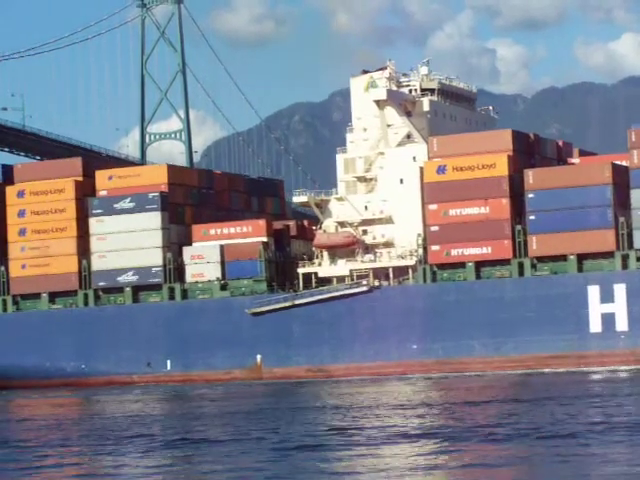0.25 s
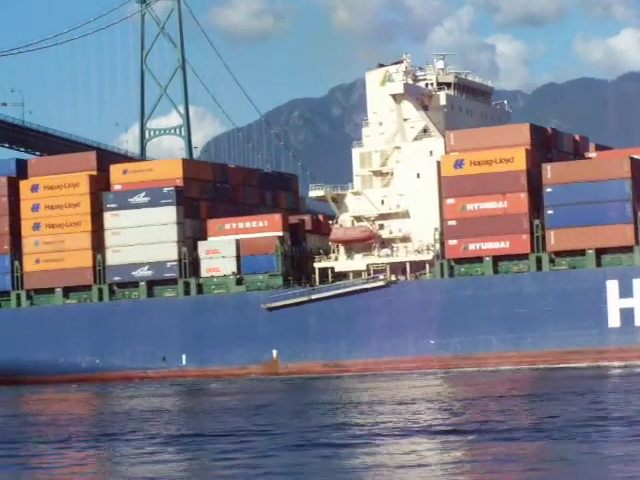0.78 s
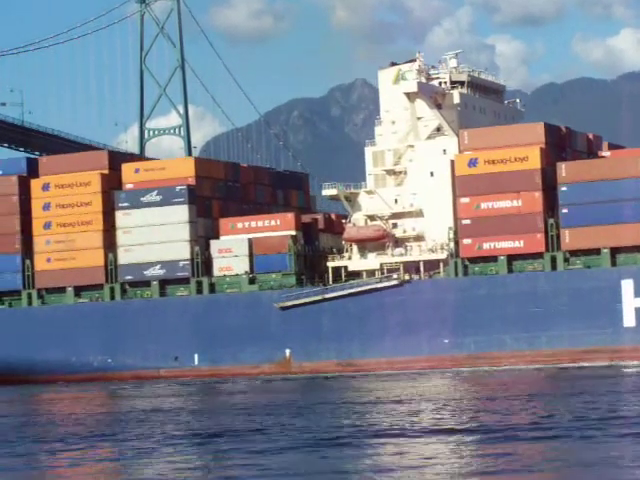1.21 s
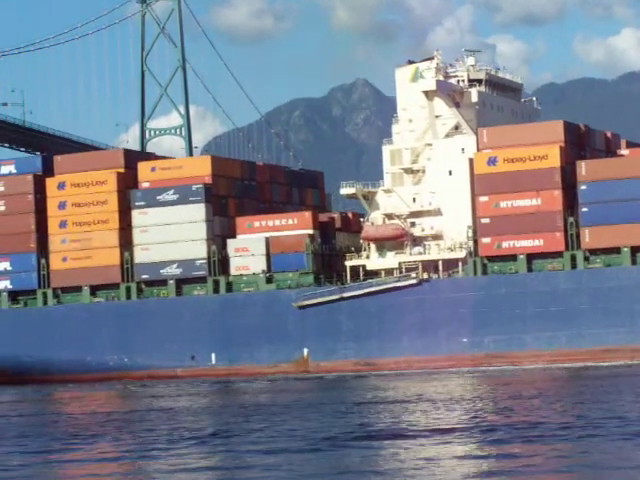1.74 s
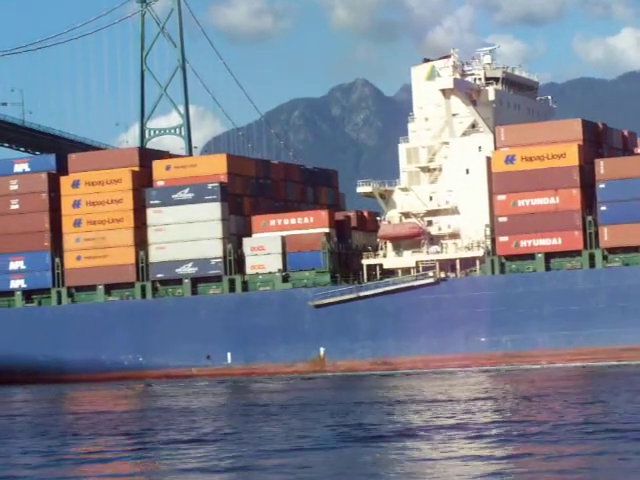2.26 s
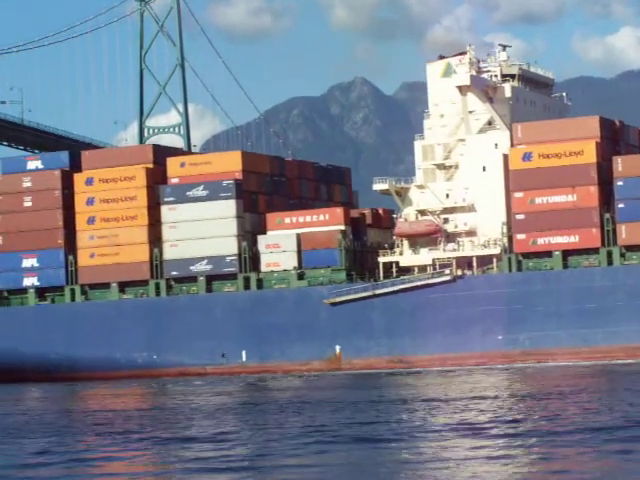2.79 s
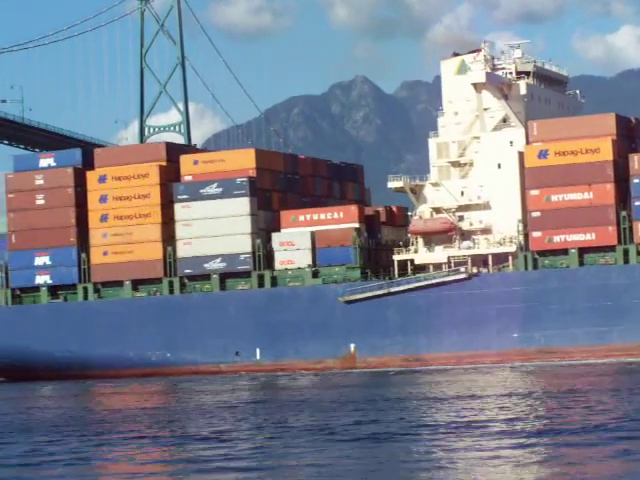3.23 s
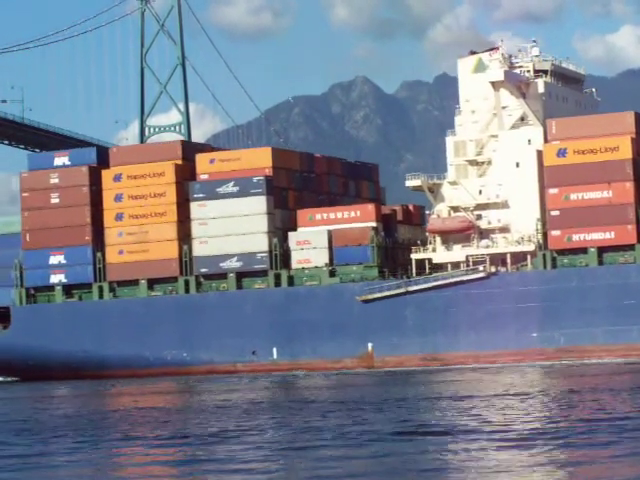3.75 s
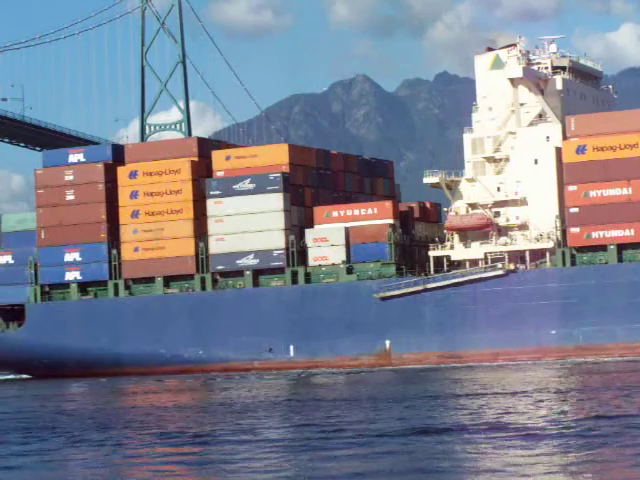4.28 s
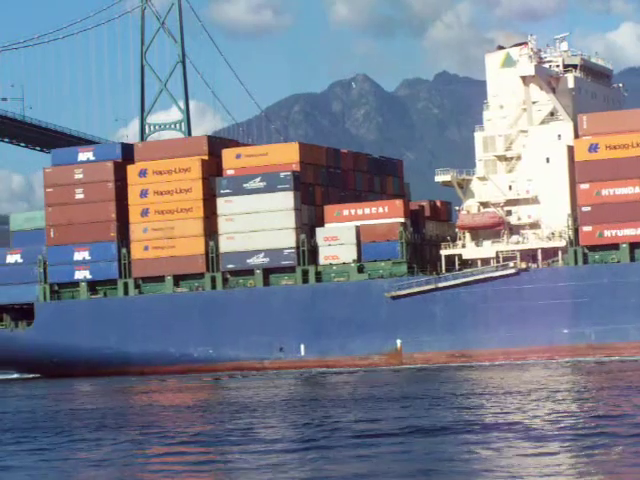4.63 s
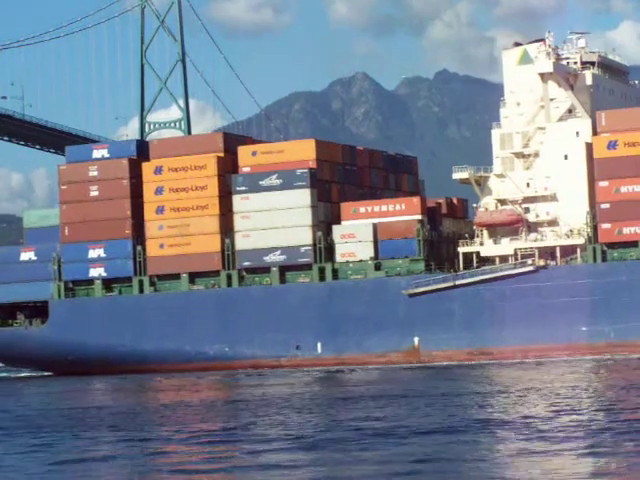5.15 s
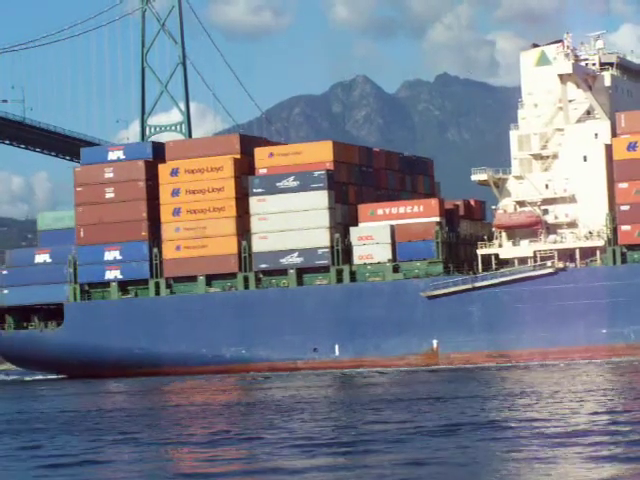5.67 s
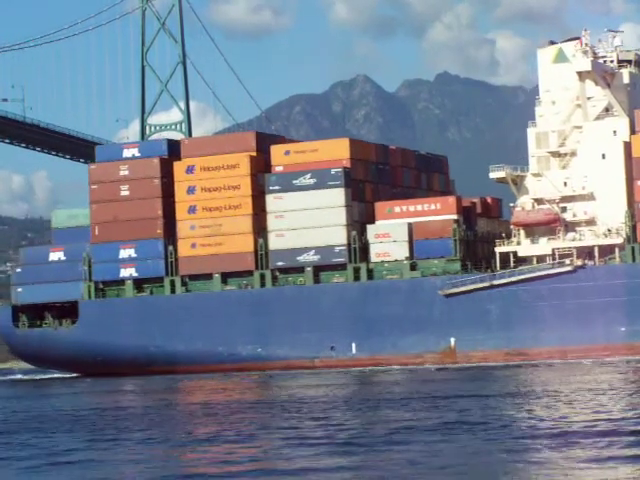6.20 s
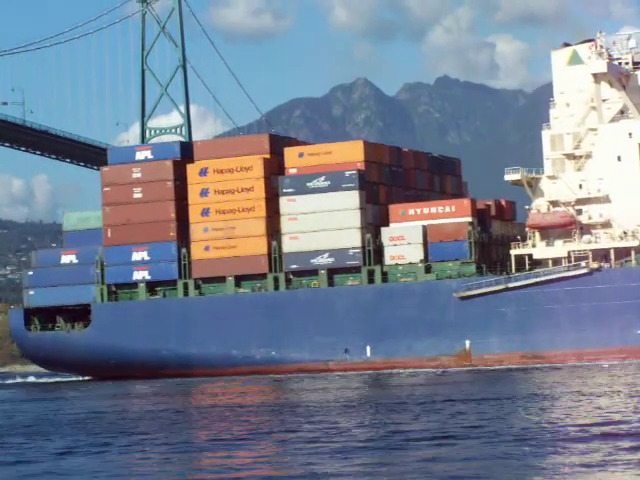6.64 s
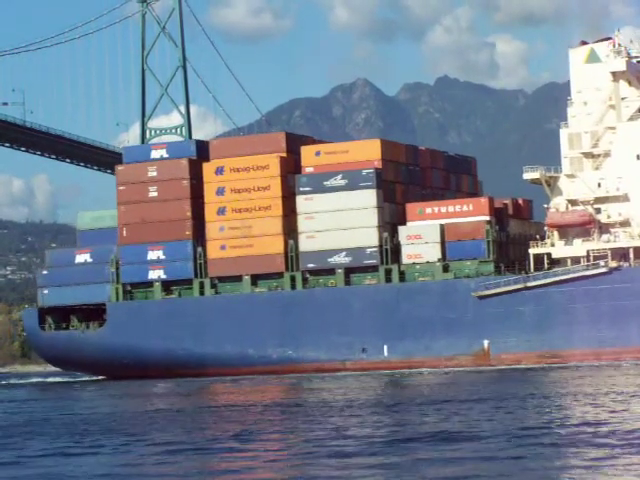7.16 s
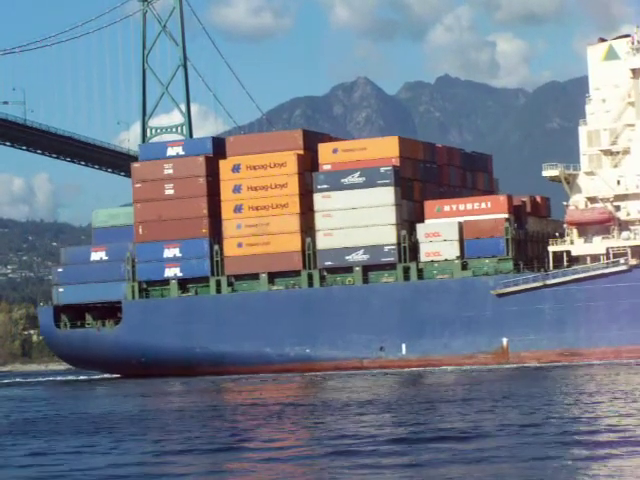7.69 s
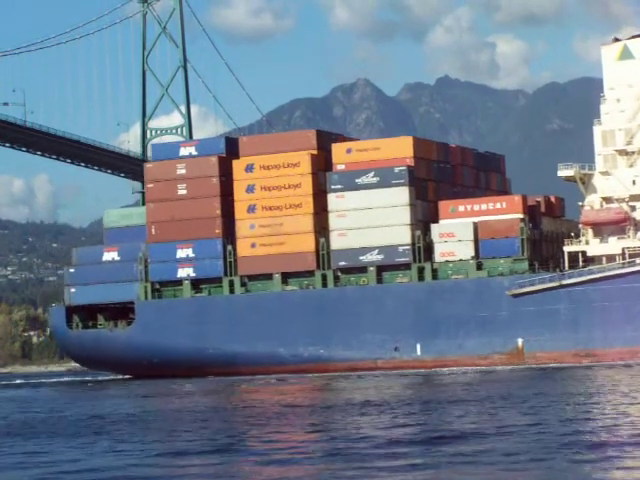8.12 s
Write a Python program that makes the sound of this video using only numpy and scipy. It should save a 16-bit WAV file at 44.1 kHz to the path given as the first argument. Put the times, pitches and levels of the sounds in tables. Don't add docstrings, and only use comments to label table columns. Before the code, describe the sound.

A big ship's diesel pulses in a deep, rapid throb while harbour water gurgles, laps and hisses close by, with faint machinery hum.

```python
import sys
import numpy as np
from scipy import signal
from scipy.fft import rfft, irfft, next_fast_len
from scipy.io import wavfile
from scipy.ndimage import uniform_filter1d, map_coordinates

SR = 44100
rng = np.random.default_rng(int(sys.argv[2]) if len(sys.argv) > 2 else 0)


def master_out(mix):
    frames = np.transpose(np.atleast_2d(mix))
    ceiling = np.clip(frames, -1, 1)
    pcm = np.round(ceiling * 32767).astype(np.int16)
    wavfile.write(sys.argv[1], SR, pcm)


def to_linear_factor(level_db):
    exponent = np.asarray(level_db, float) / 20
    return 10 ** exponent


N = 370881


def unit(x):
    return x / np.sqrt(np.mean(x ** 2) + 1e-20)


def curves(rows):
    s, *columns = np.transpose(rows)
    t = np.arange(N) / SR
    return [np.interp(t, s, column) for column in columns]


def wobble(rate):
    knots = rng.standard_normal(int(N * rate / SR) + 4)
    return map_coordinates(knots, [np.arange(N) * rate / SR])


def filtered(x, response):
    m = next_fast_len(len(x) + SR)
    hz = np.fft.rfftfreq(m, 1 / SR)
    return irfft(rfft(x, m) * response(hz), m)[:len(x)]


def coloured(x, spectrum):
    f, db = np.transpose(spectrum)
    return unit(filtered(x, lambda hz: to_linear_factor(np.interp(np.log(hz + 1), np.log(f + 1), db))))


def rush(patchy_db):
    z = signal.stft(rng.standard_normal(N + 512), nperseg=512)[2]
    field = uniform_filter1d(rng.standard_normal(z.shape), size=5, axis=0)
    field = uniform_filter1d(field, size=12, axis=1)
    return unit(signal.istft(z * to_linear_factor(patchy_db * unit(field)), nperseg=512)[1][:N])


def bubbles(s, db, hz, cycles, rise):
    life = (cycles / hz)[:, None]
    t = np.arange(min(1500, round(5 * life.max() * SR))) / SR
    sing = np.sin(2 * np.pi * hz[:, None] * t * (1 + rise * t / life / 2))
    envelope = np.exp(-t / life) * (1 - np.exp(-4 * t / life))
    rows = to_linear_factor(db + 4)[:, None] * sing * envelope
    at = np.round(s * SR).astype(int)[:, None] + np.arange(len(t))
    return np.bincount(at.ravel(), rows.ravel(), N + 2 * len(t))[:N]


def swarm(count, hz, spread, cycles, sizes_db):
    u = rng.random((count, 2))
    pitch = hz * np.exp(spread * rng.standard_normal(count))
    level_db = -sizes_db * np.log(u[:, 1] + 0.0013)
    return unit(bubbles(u[:, 0] * N / SR, level_db, pitch, cycles, rise=0.214))


def swells(voice_hz, calm_db):
    # crest t/s, swell time/s, level/dB, centre f/Hz
    breaking_waves = [(.1, .3, -27, 730), (.25, 0.68, -38.5, 5000), (.75, 0.36, -30.5, 860),
                      (1.0, 0.18, -39.5, 2440), (1.4, 0.16, -42, 2200), (2.25, 0.1, -33, 500),
                      (2.26, .35, -41, 5600), (2.92, 0.41, -39, 5200), (2.78, 0.18, -30, 790),
                      (3.2, 0.24, -29.5, 850), (3.35, 0.34, -45, 2600), (3.9, 0.28, -32.5, 886),
                      (4.05, .35, -43, 3800), (4.8, 0.15, -36, 720), (4.75, 0.42, -44, 2600),
                      (5.55, 0.26, -35.5, 1425), (5.549, .25, -47, 5000), (6.1, 0.42, -39, 4180),
                      (6.0, 0.45, -28.5, 830), (6.5, 0.14, -36.5, 1290), (6.75, 0.089, -31, 500),
                      (7.15, 0.22, -34.5, 643), (7.8, 0.15, -41.5, 2350), (8.2, 0.23, -41, 1980),
                      (.6, .4, -33.5, 139), (3.1, 0.5, -34, 140), (4.6, 0.61, -33, 139),
                      (5.9, 0.25, -35, 140), (7.8, 0.65, -30.5, 139)]
    spread_octaves = 0.81
    t = np.arange(N) / SR
    power = to_linear_factor(2 * calm_db)
    for s, swell, db, hz in breaking_waves:
        nearness = np.exp(-(np.log2(hz / voice_hz) / spread_octaves) ** 2)
        power = power + to_linear_factor(2 * db) * nearness / np.cosh((t - s) / swell) ** 2
    return np.sqrt(power)


def hums():
    # t/s, first f/Hz, second f/Hz, third f/Hz
    motor_speeds = [(0, 218.0, 99.8, 140.9), (1.9, 220.0, 99.72, 140.9), (3.3, 221.3, 99.9, 140.9),
                    (4.7, 223.3, 99.7, 140.2), (5.6, 223.5, 99.53, 140.2), (8.41, 226, 99.41, 140.7)]
    # motor, multiple, level/dB, loudest t/s, time to 10 dB less/s
    vent_tones = [(0, 1, -40.5, .9, 4), (1, 2, -46, 3, 5), (1, 2, -42.5, 7.8, 2.4), (1, 3, -42.5, 3.7, 1.6),
                  (1, 3, -47, 6.2, 2.2), (1, 4, -40.5, 4.3, 2.8), (1, 5, -44.5, 5.5, 5), (2, 1, -42, 8, 5),
                  (2, 2, -46, 4.2, 1.8), (2, 3, -43, 5.2, 2), (2, 3, -43, 8, 1.5)]
    t = np.arange(N) / SR
    phases = [2 * np.pi * np.cumsum(hz + .08 * wobble(3)) / SR for hz in curves(motor_speeds)]
    total = np.zeros(N)
    for motor, k, db, s, reach in vent_tones:
        level_db = db - 10 * ((t - s) / reach) ** 2 + 1.8 * wobble(2.5)
        total += np.sqrt(2) * to_linear_factor(level_db) * np.sin(k * phases[motor] + k * k)
    return total


def hull():
    # centre f/Hz, level between waves/dB
    plating = (140, -34)
    # f/Hz, level/dB
    roar_spectrum = [(5, -12.5), (25, -11.5), (35, -5.5), (60, -3), (95, -3), (120, -1), (150, -0.5),
                     (180, -6), (210, -8), (260, -11), (330, -12.5), (500, -120)]
    unrest_db = 1 + 0.7 * wobble(5.2)
    return swells(*plating) * to_linear_factor(unrest_db) * coloured(rush(patchy_db=0.7), roar_spectrum)


def drops():
    # t/s, peak level/dB, f/Hz
    plop_events = [
        (.061, -21, 650),
        (.229, -18, 390),
        (2.549, -16, 490),
        (5.524, -19, 330),
        (7.057, -19, 689),
    ]
    # t/s, peak level/dB, f/Hz
    drip_events = [(.391, -24, 4650), (1.037, -26, 3900), (3.737, -29, 4700), (3.738, -31, 2500),
                   (3.742, -31, 6000), (4.492, -26, 2300), (5.406, -22, 1550), (5.451, -23, 2800),
                   (5.452, -23, 3300), (7.649, -30, 2830)]
    plops = bubbles(*np.transpose(plop_events), cycles=3, rise=.06)
    drips = bubbles(*np.transpose(drip_events), cycles=5.5, rise=.03)
    return plops + drips


def water():
    # centre f/Hz, level between waves/dB
    wash_voices = [
        (520, -30),
        (1300, -37),
        (2600, -42),
        (5200, -46.5),
    ]
    # f/Hz, level/dB
    gurgle_spectrum = [(140, -38.5), (240, -7), (310, -5), (360, 0), (404, 0.5), (466, -2), (600, 1),
                       (690, 1), (760, -2.5), (900, -13), (1170, -40), (1980, -120)]
    surf_spectrum = [(500, -9), (850, -3.5), (1150, -3), (1350, -7), (1610, -3), (1950, -10.5),
                     (2540, -41.5), (4290, -120)]
    splash_spectrum = [(1120, -30.5), (1900, -4.5), (2300, 1), (2720, -0.5), (3130, -5), (3350, -7.5),
                       (3520, -3.5), (3750, -18), (4940, -36.5), (8360, -120)]
    spray_spectrum = [(2180, -25.5), (3700, -2.5), (4610, -1), (5170, -4.5), (7120, -7), (7730, -11.5),
                      (8740, -30), (11400, -64), (19200, -120)]
    surge_db = .3 * wobble(9)
    gurgle = rush(patchy_db=.4) + .12 * swarm(count=1600, hz=520, spread=.35, cycles=3, sizes_db=2)
    surf = rush(patchy_db=.5) + .12 * swarm(count=2500, hz=1400, spread=.3, cycles=3, sizes_db=2)
    splash = rush(patchy_db=.7) + .12 * swarm(count=2000, hz=2700, spread=.3, cycles=3, sizes_db=2.2)
    spray = rush(patchy_db=.7) + .15 * swarm(count=2000, hz=5200, spread=.3, cycles=3, sizes_db=2.2)
    voices = [coloured(gurgle, gurgle_spectrum), coloured(surf, surf_spectrum),
              coloured(splash, splash_spectrum), coloured(spray, spray_spectrum)]
    return to_linear_factor(surge_db) * sum(swells(*row) * voice for row, voice in zip(wash_voices, voices))


def resonance(hz, width_hz, db, sign):
    def response(f):
        damping = 1j * f * width_hz
        return sign * to_linear_factor(db) * (damping / (hz ** 2 - f * f + damping)) ** 2
    return response


def engine():
    # t/s, cycle rate f/Hz
    engine_speed = [(0.0, 6.0356), (2.0, 6.043), (3.5, 6.0327), (4.5, 6.0179), (6.0, 6.0202),
                    (8.41, 6.0248)]
    # level abeam/dB, level astern/dB, delay abeam/ms, delay astern/ms
    cylinders = [(-0.78, -4.6, 33.78, 34.52), (1.85, -1.47, 47.22, 46.63), (2.36, 1.67, 44.63, 44.98),
                 (-2.94, -6.6, 42.16, 42.72), (4.8, 4.61, 40.01, 40.07), (6.62, 5.59, 40.04, 40.14),
                 (-5.65, -4.5, 37.92, 38.43)]
    # f/Hz, width/Hz, level/dB
    pipe_modes = [
        (38.3, 6.3, -33.3),
        (67.0, 20.9, -34.7),
        (84.0, 7.6, -35.3),
        (92.2, 5.5, -39.8),
        (112.7, 4.0, -35.5),
    ]
    # start t/s, end t/s
    funnel_turn = (1.8, 6.5)
    # t/s, level/dB
    throb_levels = [(0, -23.5), (1.5, -25.3), (3.6, -25.5), (4.7, -22.5), (6.0, -19.5), (7.2, -21.5),
                    (8.41, -22)]

    throb_db, = curves(throb_levels)
    lead = SR
    speed = np.pad(curves(engine_speed)[0], (lead, 0), "edge")
    turns = np.cumsum(speed) / SR - lead * speed[0] / SR
    firing = np.arange(-35, 370)
    scatter = rng.standard_normal((len(firing), 2))
    at = np.interp(firing / len(cylinders), turns, np.arange(len(turns)), right=len(turns))
    astern = np.interp((at - lead) / SR, funnel_turn, (0, 1))
    near_db, far_db, near_ms, far_ms = np.transpose(cylinders)[:, firing % len(cylinders)]
    blow_db = near_db + astern * (far_db - near_db) + .4 * scatter[:, 1]
    way_ms = near_ms + astern * (far_ms - near_ms) + .08 * scatter[:, 0]
    at = np.round(at + way_ms * SR / 1000).astype(int)
    blows = np.bincount(at, to_linear_factor(blow_db))[:lead + N]

    boom, *throb = [filtered(blows, resonance(*mode, sign=(-1) ** k))[lead:] for k, mode in enumerate(pipe_modes)]
    boom_db = -28 + 0.2 * wobble(1.5)
    return to_linear_factor(boom_db) * unit(boom) + to_linear_factor(throb_db) * unit(sum(throb))


def scene():
    return (hums() + hull() + drops() + water() + engine())[None]


def roll_off(x):
    return signal.sosfilt(signal.butter(12, 8890, fs=SR, output="sos"), x)


def record(dry):
    return roll_off(dry)


dry = scene()
out = record(dry)
master_out(out)
```